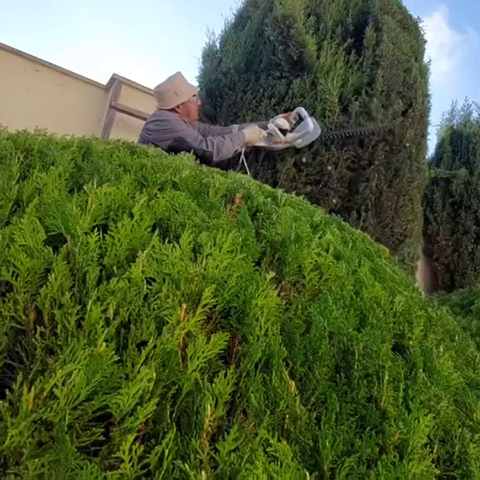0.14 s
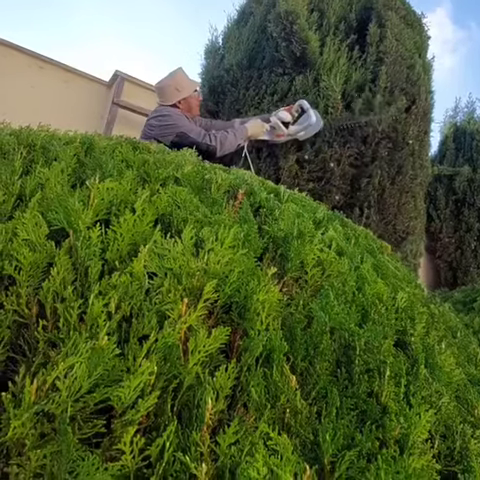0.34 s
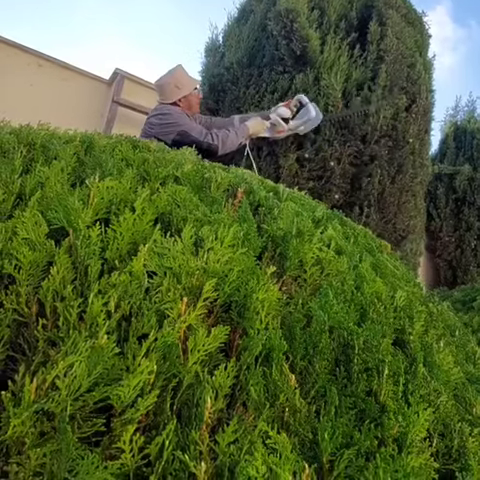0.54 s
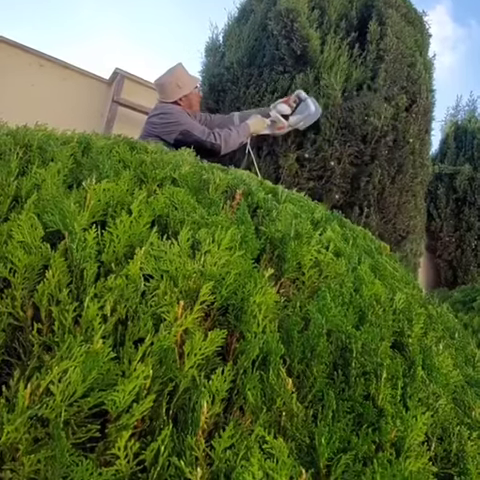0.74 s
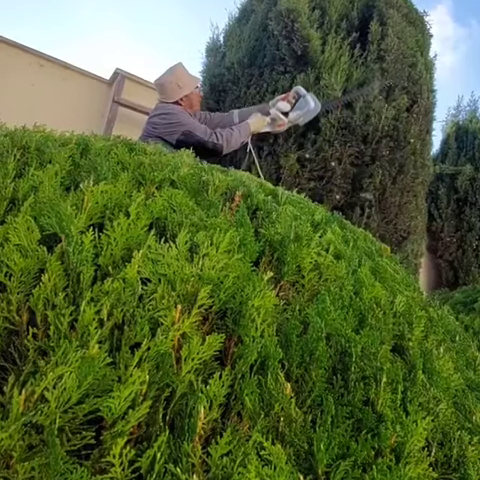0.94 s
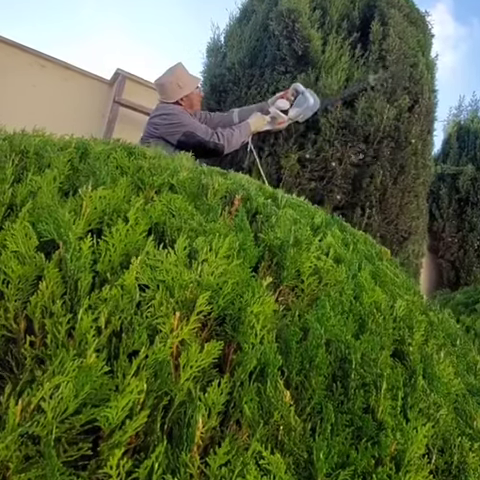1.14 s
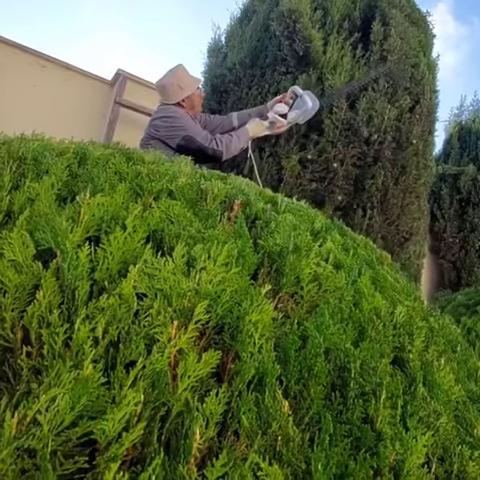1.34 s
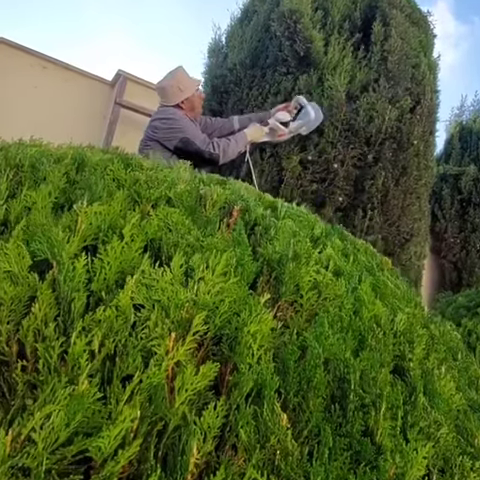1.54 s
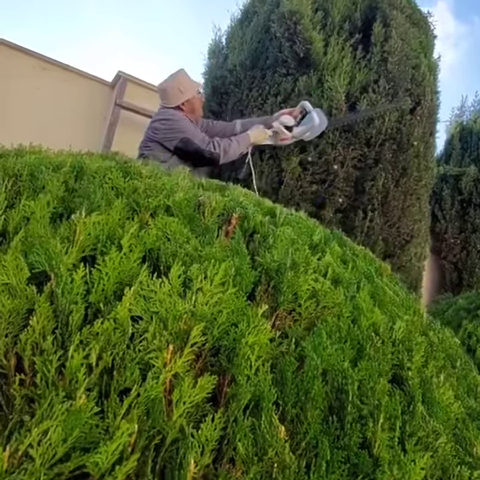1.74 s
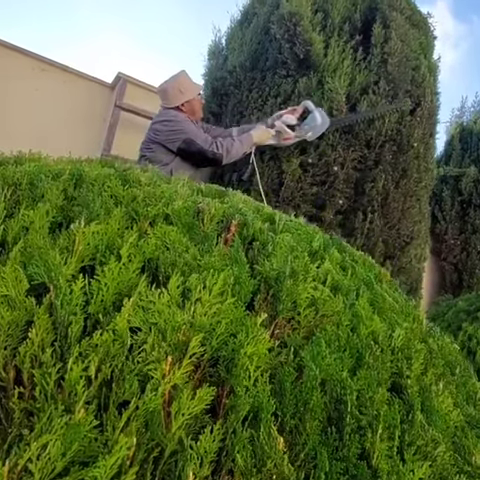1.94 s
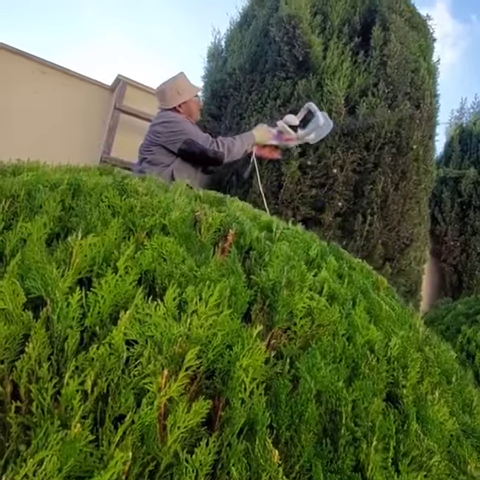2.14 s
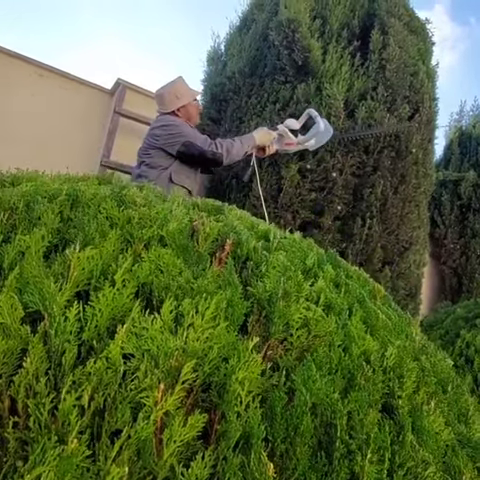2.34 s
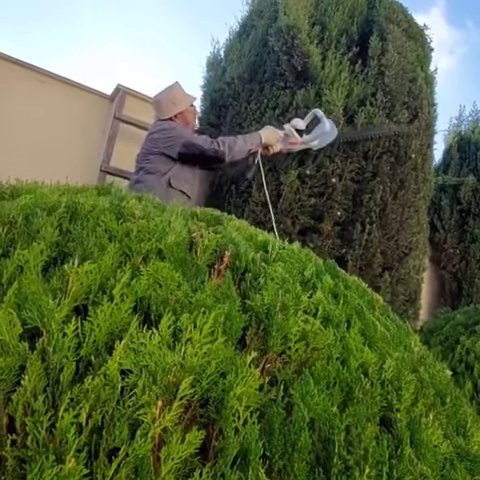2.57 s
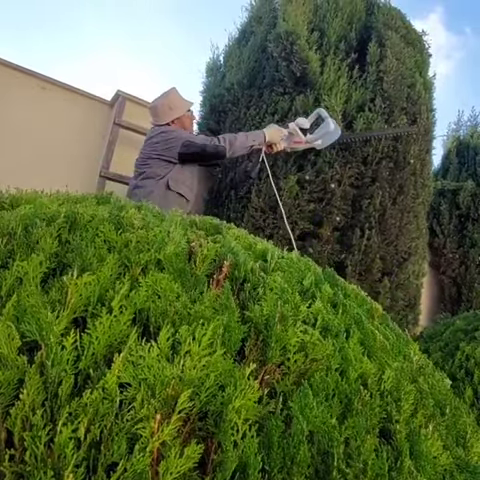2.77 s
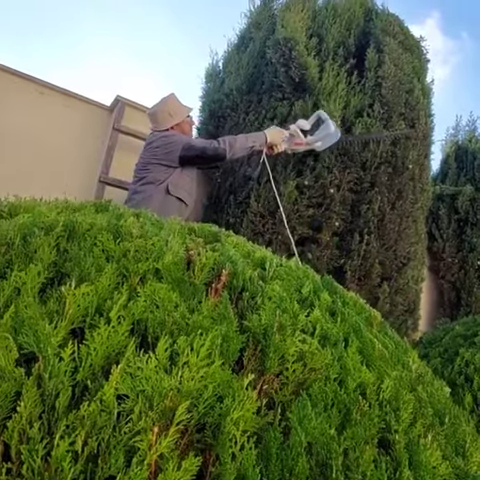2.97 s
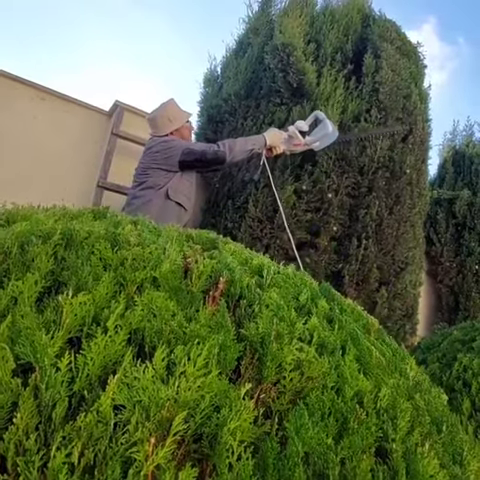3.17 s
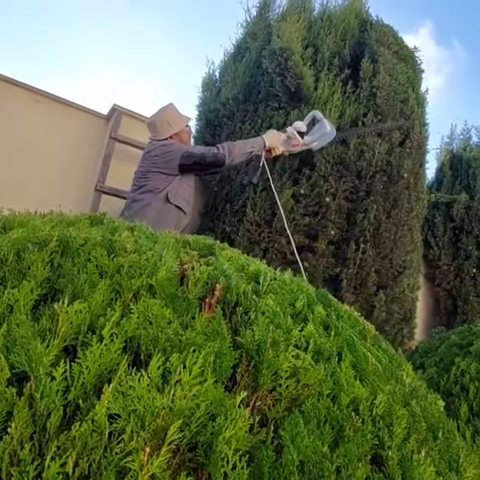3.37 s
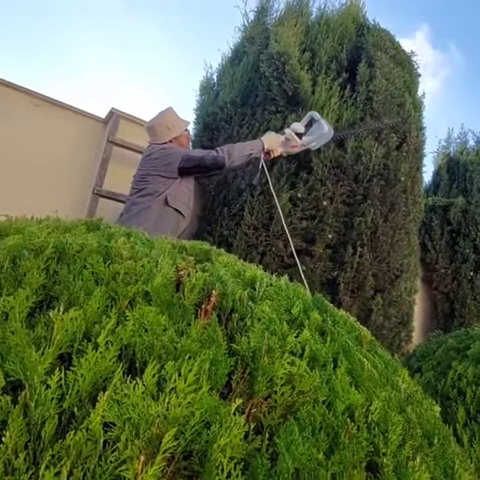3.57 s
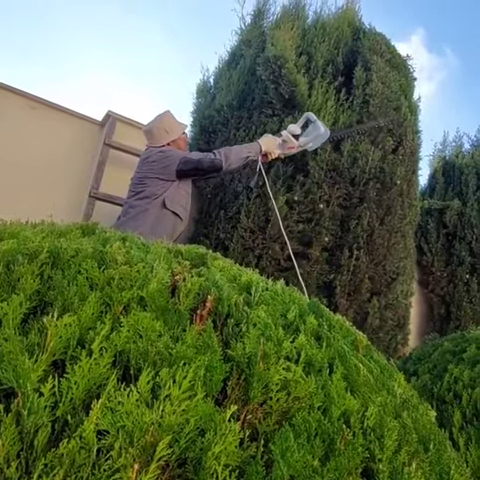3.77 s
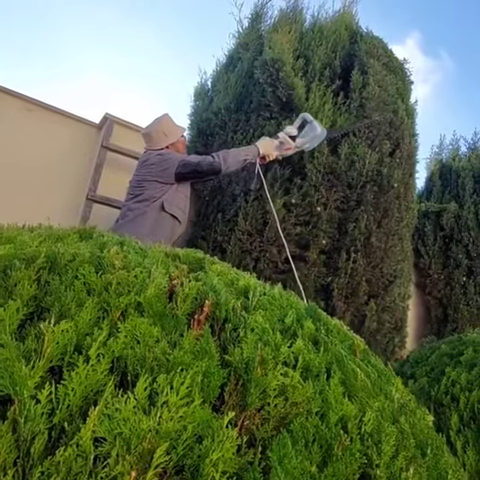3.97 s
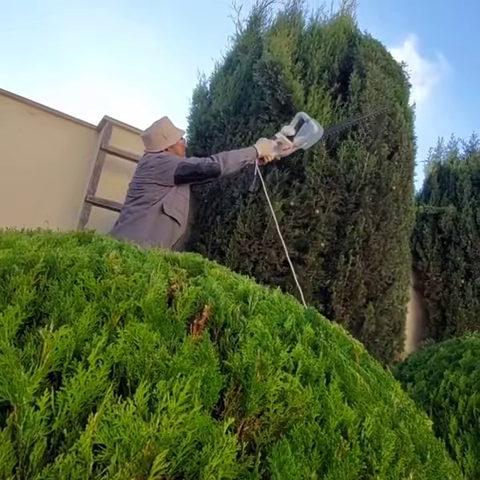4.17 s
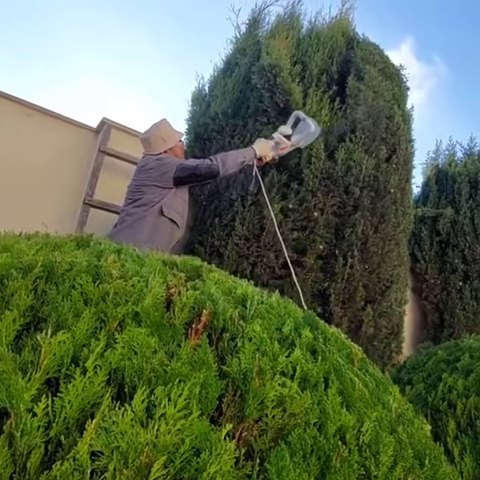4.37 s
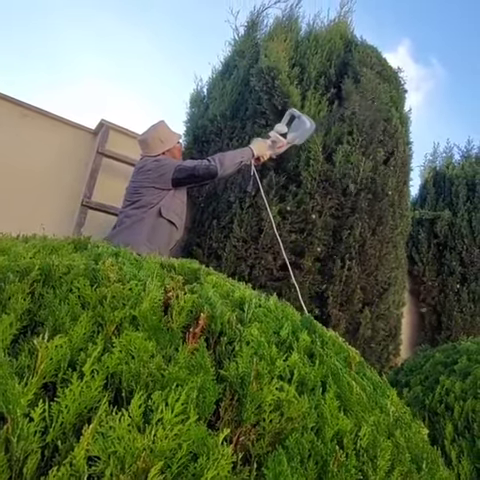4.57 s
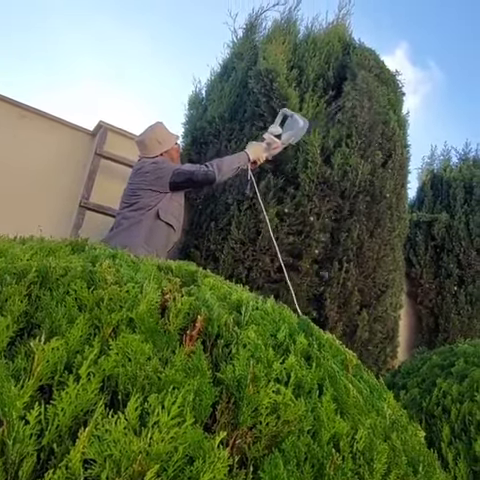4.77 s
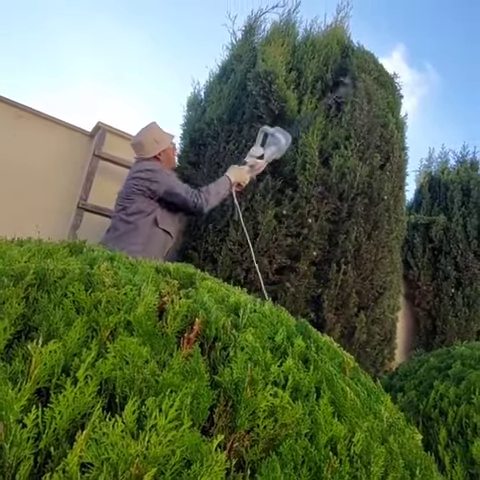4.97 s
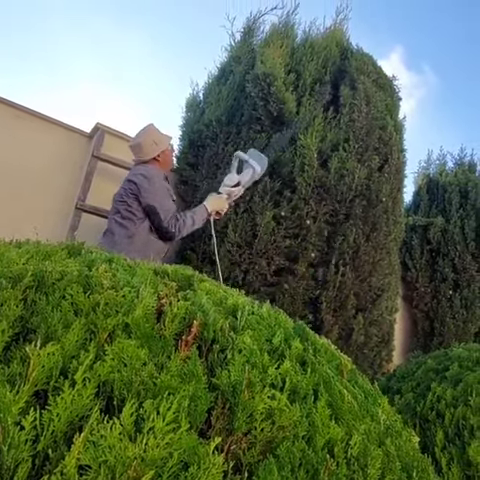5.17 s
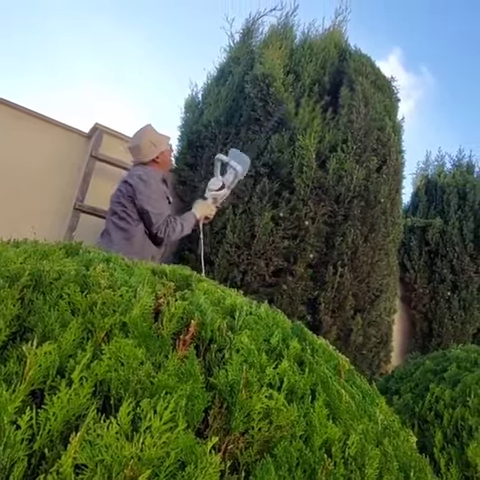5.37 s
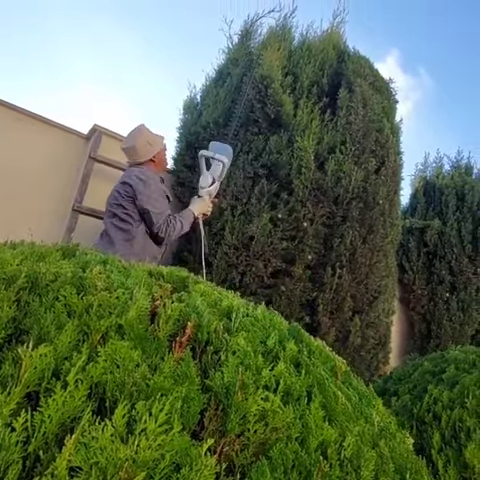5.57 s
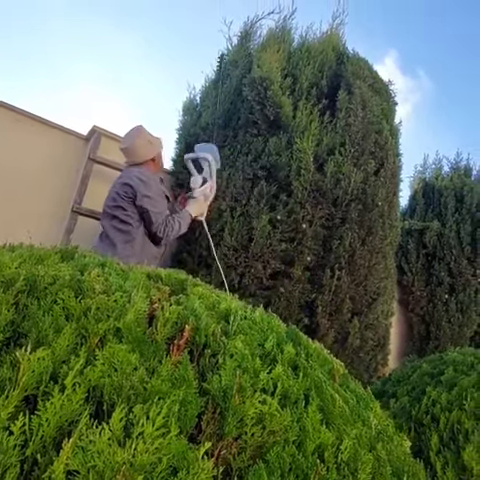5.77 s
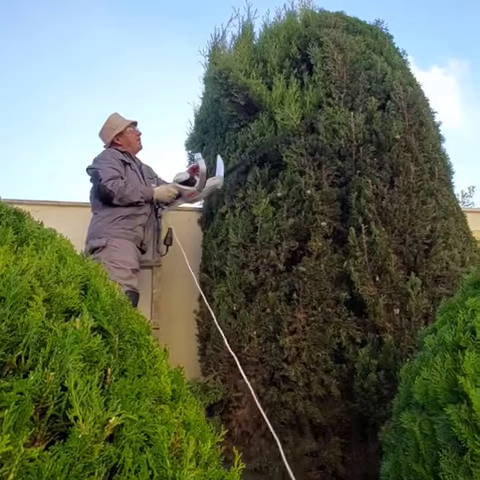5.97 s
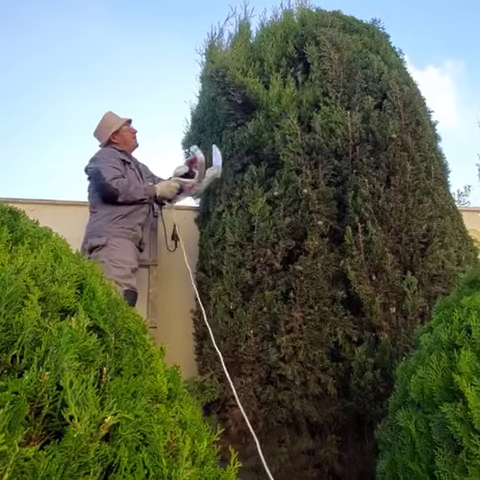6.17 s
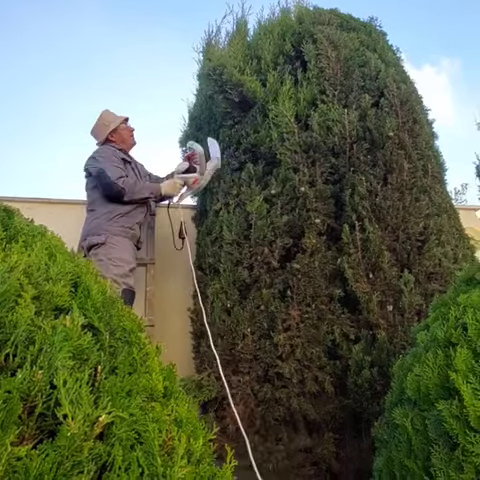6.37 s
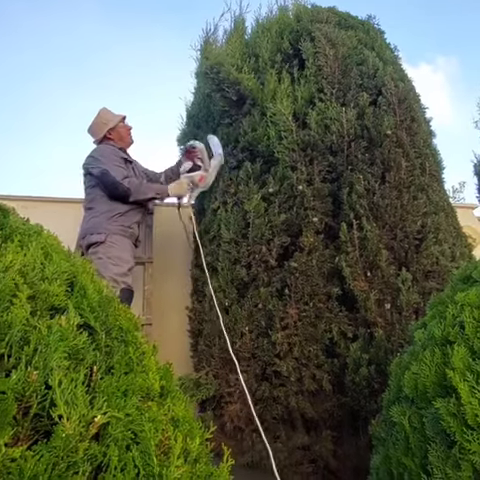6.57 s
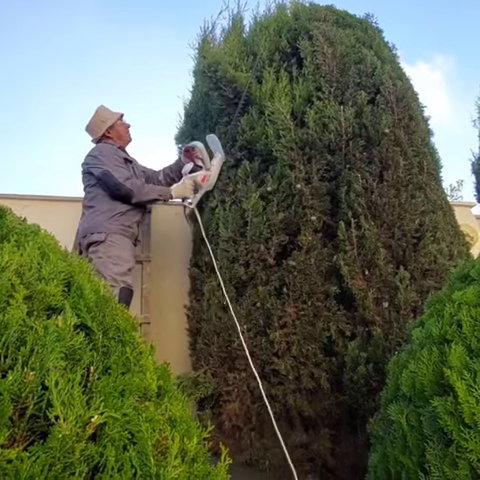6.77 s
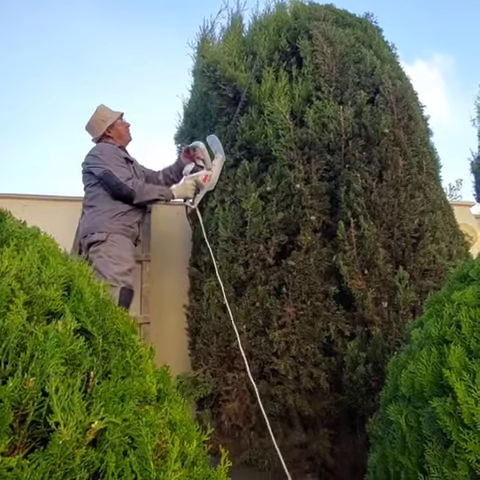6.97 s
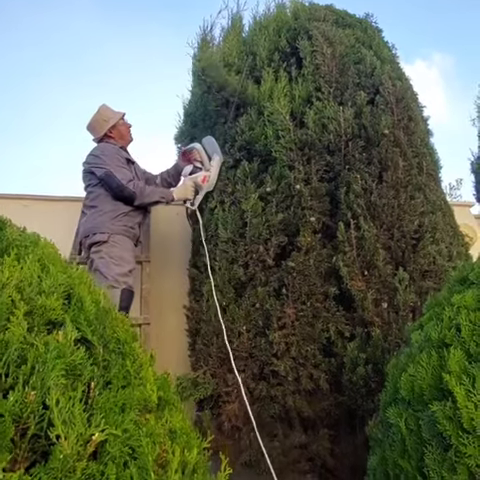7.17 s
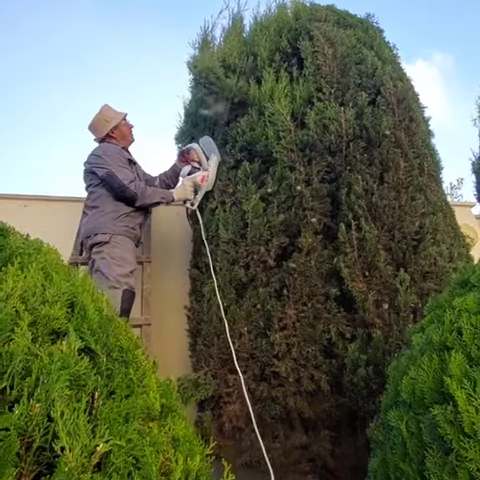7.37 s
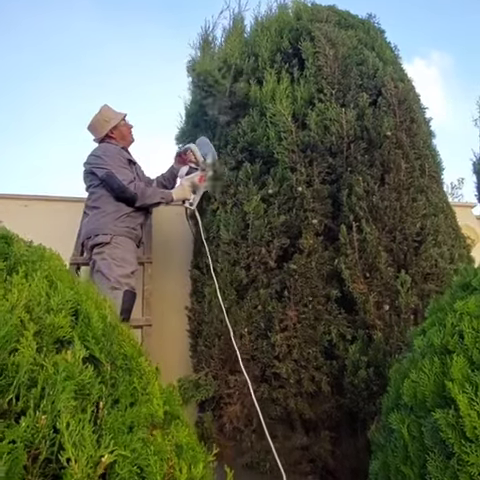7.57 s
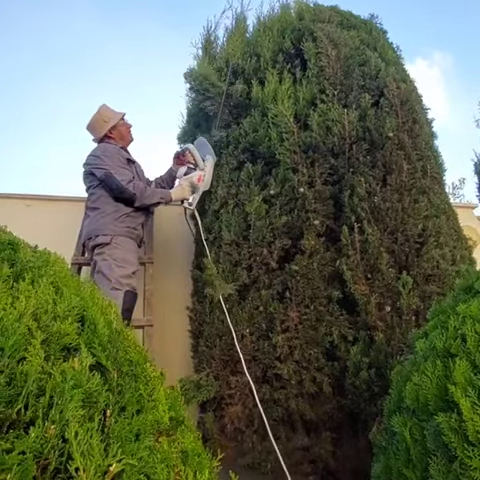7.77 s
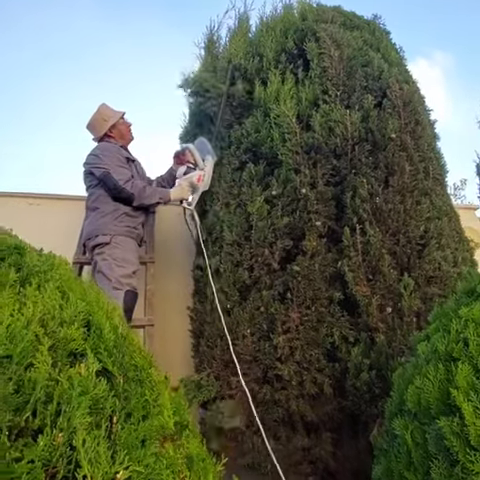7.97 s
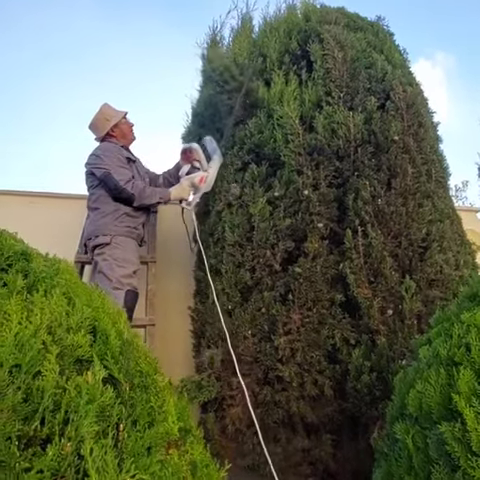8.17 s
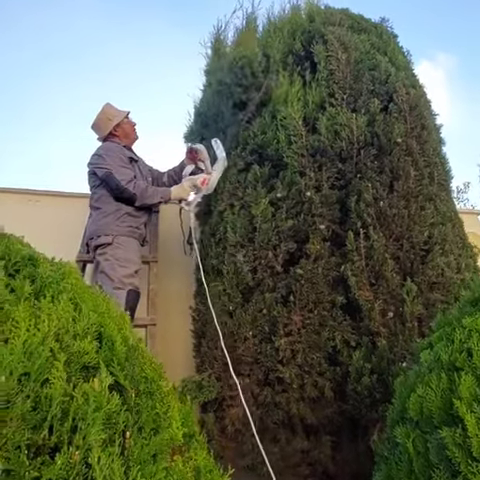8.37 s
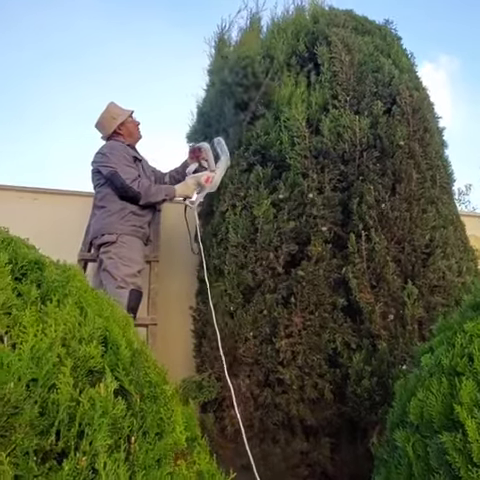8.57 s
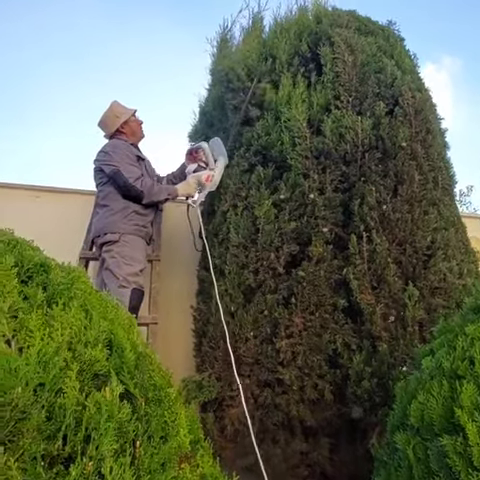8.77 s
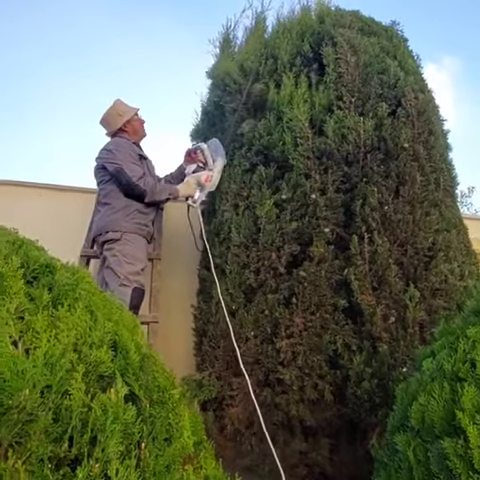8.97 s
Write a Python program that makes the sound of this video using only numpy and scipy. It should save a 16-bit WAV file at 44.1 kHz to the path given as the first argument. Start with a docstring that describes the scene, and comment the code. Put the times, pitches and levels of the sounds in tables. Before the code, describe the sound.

In a quiet walled garden, an electric hedge trimmer sounds three times: a quick blip, a run of about four and a half seconds, and another run lasting to the end. Its fast motor whines while the blades grind and snip through twigs, the pitch sagging only slightly under load. Each stop rings briefly off the walls, and faint ticks come from the right of the microphone in the pauses.

```python
"""You hear an electric hedge trimmer rasp and whine three times in a walled garden: a blip, then two long runs.
A fast motor turns a small gear on a big crank wheel, which shakes the blades through conifer twigs.
Each run starts at or near full speed and stops short, and the walls ring on. The pauses hold
quiet air, small ticks and one faint moan. The trimmer is left of two microphone openings, the ports."""
import sys
import numpy as np
from scipy import signal
from scipy.fft import irfft
from scipy.io import wavfile
from scipy.ndimage import uniform_filter1d

SR = 44100
rng = np.random.default_rng(int(sys.argv[2]) if len(sys.argv) > 2 else 0)


def waveform_to_disk(signal):
    """Save audio, clipped to [-1, 1], as 16-bit WAV at the path in sys.argv[1]."""
    frames = np.transpose(np.atleast_2d(signal))
    scaled = np.clip(frames, -1, 1) * 32767
    samples = np.round(scaled).astype(np.int16)
    wavfile.write(sys.argv[1], SR, samples)


N = 397763

FREE_SPEED_HZ, SPIN_UP_S = 470.0, .34  # motor turns a second with no load; how slowly it catches up
PINION_TEETH, WHEEL_TEETH = 4, 61  # the small gear and the crank wheel
SNIPS_PER_S, SNIPS_DB = 250, -2  # cut twigs; their level is set against the smooth noise
RING_HZ, RING_WIDTH_HZ, MESH_RING_SHARE = 1950, 160, 0.35  # housing ring; the main gear tone's share
RASP_HZ, RASP_WIDTH_HZ = 5090, 830
HOLLOW_HZ, HOLLOW_WIDTH_HZ = 2740, 370
BITE_HZ, BITE_WIDTH_HZ = 6800, 260
TREBLE_HZ, TOP_HZ, CUTOFF_HZ = 9100, 11640, 12980
MOAN_WIDTH_HZ = 50
LEAD_SAMPLES = SR // 2  # the motor is worked out from this far before the scene

# Each run, and the background from its start on: start_s, stop_s, air_db, leaves_db, starts_slow_by_hz
TRIMMER_RUNS = [(0.0, 0.064, -69, -62, 0), (0.519, 5.095, -70.5, -91.5, 0), (6.4383, 9.5, -67.5, -90, 29)]
# How much cutting slows the motor: time_s, slowdown_hz
LOAD_SLOWDOWN = [(0.53, 7.8), (1.04, 5.6), (1.18, 7.6), (1.36, 7), (1.75, 2.3), (2.4, .9), (3.2, .3),
                 (3.83, 3.3), (4.2, 4), (4.59, 7.6), (4.75, 6.8), (4.8, 8.9), (4.95, 7.3), (5.1, 7),
                 (6.4, 6.8), (6.45, 2), (7.3, 2.8), (7.48, 8.6), (7.8, 7.6), (8.05, 6.2), (8.4, 1.8),
                 (8.88, 0)]
# How the tool is held: time_s, swing (0 held out, 1 held up)
TOOL_SWING = [(0.0, 1), (0.5, 0.48), (0.53, 0.031), (1.5, 0.049), (2.7, 0.44), (4.2, 0.65), (5.1, 0.67),
              (6.45, 0.96), (9.02, 0.86)]
# The grinding noise over time: time_s, level_db, ring_db, rasp_db, treble_db, left_over_right_db
GRIND_LEVELS = [(0.0, -22.5, 14.5, 8, -2, -2), (0.07, -10.5, 12, -6.5, -1.5, -4.5),
                (0.53, -19, 4.5, -4.5, -3.5, 1), (1.58, -20, -2.5, -4, -3, 1),
                (2.63, -19.5, -0.5, -2, 2, -1), (3.4, -20, 1, -0.5, 2, -1.5),
                (4.1, -19.5, -1.5, -0.5, 2.5, -2), (4.73, -21, -1.5, 1.5, 1.5, -2),
                (5.08, -19, 2.5, -2, 2.5, -2), (6.45, -20, 22, 2.5, -5, -1),
                (6.9, -20, 13.5, 3.5, -2.5, -2), (7.41, -20.5, 15, 2, -0.5, -1.5),
                (7.9, -21.5, 9, 3, 2, -2), (8.38, -20.5, 4, 1.5, 3.5, -2.5), (9.02, -21.5, 5.5, 3.5, 6, -2)]
# Boosts and cuts below and above the rasp: time_s, hollow_db, top_db, bite_db
GRIND_SHADES = [(0.0, 2.5, 4.5, -2), (0.53, 2, 0.5, 1.5), (1.5, 1.5, 3, 0.5), (2.3, -4.5, -2.5, 3.5),
                (3.0, -5.5, -1, 2.5), (4.0, -4.5, 0.5, -1.5), (5.1, 2, 2, -1), (6.45, -3, 1.5, 3.5),
                (7.2, 3.5, -3, -1), (8.0, 3.5, -9.5, -2), (9.02, 5, -12, 0)]
# The blades make the grind throb: beats_per_crank_turn, depth
BLADE_BEATS = [(1, 0.07), (2, 0.05), (4, 0.05)]
# How much of the grind repeats on every crank turn: pitch_hz, power_share
REPEAT_SHARE = [(150, .7), (330, .5), (600, .35), (1200, .6), (1900, .55), (2400, .2), (3300, .2),
                (5000, .5), (10000, .25)]
# The slowest ripples in the wear pattern: cycles_per_crank_turn, level_db
CRANK_RIPPLES = [(4, -2), (5, -4.5), (6, 5), (7, 2.5), (8, 0), (9, 1.5), (10, 0.5), (11, 3.5), (12, -9),
                 (13, 2), (14, 6), (16, -16.5)]
# Low resonances of the casing: pitch_hz, half_width_hz, boost_db
CASING_RESONANCES = [(199, 33, -1), (627, 72, 7), (1116, 25, 5.5)]
# The housing ring faces the right port, which gets more of ring_db: left_share, right_share
RING_SIDES = [
    [[0.27]],
    [[0.8]],
]
# Tones tied to the motor shaft: cycles_per_turn, kind (0 fan, 1 gear, 2 hum), left_db, right_db
SHAFT_TONES = [(1, 2, -6, -5), (4, 1, -9.5, 0), (8, 1, -8, -10), (12, 1, -21.5, -21), (17, 0, 0, -12)]
# The crank load swings the tooth force, adding side tones: offset_cycles_per_crank_turn, level_db
GEAR_SIDE_TONES = [(-2, -14.5), (-1, -4), (1, -15), (2, -15.5), (3, -19.5), (4, -19), (5, -7), (6, -15.5)]
# The fan's whine: time_s, level_db
FAN_LEVELS = [(0.53, -36), (0.62, -33), (0.95, -28), (1.03, -45), (1.12, -26), (1.3, -30.5), (1.35, -31),
              (1.56, -27.5), (1.72, -33), (1.8, -37.5), (2.04, -36), (2.1, -40), (2.39, -28.5), (2.5, -35),
              (2.6, -28.5), (2.9, -32), (2.97, -41), (3.1, -24), (3.4, -36), (3.7, -56), (3.85, -29),
              (3.98, -31), (4.1, -45.5), (4.23, -27), (4.54, -40.5), (4.62, -33), (4.74, -33.5),
              (4.85, -31), (4.9, -39), (4.97, -25.5), (5.05, -40.5), (5.12, -41.5), (6.44, -25),
              (6.46, -29), (6.5, -43), (6.7, -36), (6.88, -31), (7.28, -23), (7.53, -29.5), (7.67, -26),
              (8.02, -26.5), (8.14, -35), (8.3, -34), (8.75, -25.5), (9.01, -33)]
# Meshing gear teeth and shaft hum: time_s, gear_db, hum_db
GEAR_AND_HUM_LEVELS = [(0.53, -33.5, -36.5), (0.8, -32, -40), (1.04, -32, -39), (1.3, -28.5, -41.5),
                       (1.7, -30, -36), (2.1, -34.5, -43), (2.4, -38, -42), (2.75, -37, -36.5),
                       (3.2, -37, -45), (3.68, -37.5, -62), (3.85, -36, -69), (4.3, -28.5, -41),
                       (4.7, -34, -44), (4.9, -29.5, -44), (5.1, -38, -62), (6.45, -46.5, -35.5),
                       (6.96, -43, -36), (7.15, -39, -45), (7.33, -48, -59), (7.45, -38, -40),
                       (7.8, -33.5, -40), (8.08, -32, -44.5), (8.18, -34.5, -45), (8.3, -33, -36),
                       (8.5, -32, -37), (8.75, -31.5, -38), (9.01, -36, -34)]
# Gear tones at the left port as the housing turns: time_s, boost_db
GEAR_LEFT_BOOST = [(0.53, -3), (2.0, 1), (3.7, 5.5), (5.1, 1), (6.45, 0.5), (7.3, -3), (7.5, -7),
                   (8.15, -7), (8.3, 6), (9.02, 2)]
# Typical level wobble of each kind of tone: fan_db, gear_db, hum_db
TONE_FLUTTER = [1.5, 1.8, 1.5]
# Fade time of the tones as a multiple of the walls' ring time: fan_factor, gear_factor, hum_factor
TONE_FADE_FACTORS = [1.15, .8, .8]
# Colour at the ports, tool held out or up: pitch_hz, out_left_db, out_right_db, up_left_db, up_right_db
PORT_COLOURS = [(30, -46, -41.5, -46.5, -44), (60, -28.5, -26, -28.5, -33), (109.7, -25, -23.5, -24, -23.5),
                (152, -22, -18, -22.5, -21.5), (235, -16.5, -15.5, -14.5, -18.5),
                (290, -13.0, -12, -10.5, -12.5), (400, -10.5, -9.0, -6, -8.5), (503, -10, -7.5, -8, -13),
                (724, -12, -8.5, -8, -9), (920, -5, -6, -2.5, -6.5), (1200, -7, -4, -3, -6),
                (1530, 0.0, 2.5, 0.5, -2), (2220, -5.5, -6.5, -4.5, -4.5), (2270, -1, 3, 1.5, -5.5),
                (2640, -3.5, -1, -2.5, -3), (3220, -4, -2, -2.5, -5.5), (3570, -6, 1, -5, -3.5),
                (3840, -5.0, 3.5, 0, -0.5), (4340, -5.5, 3.5, -7.5, 2.5), (4800, 0.5, 1, -2.5, -2),
                (5270, -5, 0.5, -8, -2), (5680, -9.5, -7, -5, -5.5), (6100, -6, -5.5, -9, -8.5),
                (6660, -5.5, -13.5, -4, -11.5), (7000, -3.5, -17.5, -7.5, -9),
                (7500, -4, -21.5, -2.5, -13.5), (8400, -4.5, -22.5, -5.5, -18), (8600, -2, -25, -12, -18),
                (9300, -7, -20, -9, -10.5), (10200, -6.5, -15.5, -8.5, -6.5), (11400, -7, -4, -7, -7),
                (12620, -5.5, -10.5, -3.5, -6), (13000, -2.5, -9, -11, -13.5)]
# How far the right port lags behind the left: pitch_hz, held_out_cycles, held_up_cycles
RIGHT_PORT_LAG = [(30, 0, 0), (340, .03, 0), (860, .19, .12), (1380, .22, .11), (1890, .38, .14),
                  (2410, .57, .47), (2930, .64, .49), (3450, .9, .47), (3960, 1.05, .48), (4480, 1.37, .9),
                  (5000, 1.53, 1.4), (5510, 1.95, 1.57), (6030, 2.02, 2.0), (7000, 2.5, 2.1),
                  (13000, 5.4, 4.6)]
# The walls' ring: pitch_hz, ring_time_s (to fall 60 dB), walls_over_direct_db, left_right_likeness
WALL_RING = [(59, .35, 9.5, 0.17), (160, 0.71, -1, 0.72), (304, 0.57, -5.5, 0.67), (486, 0.61, 7, 0.32),
             (582, 0.65, -3, 0.84), (696, 0.57, 5, 0.3), (1744, 0.62, 2, 0.15), (2220, .55, -5.5, .1),
             (2970, 0.55, -7, 0.032), (3570, 0.4, 4, .05), (4650, 0.38, 4.5, 0.041),
             (7550, 0.38, 0.5, 0.061), (12940, 0.11, 17, 0.039)]
# Small ticks in the pauses: start_s, peak_db, left_over_right_db
TICK_EVENTS = [(0.329, -49, -15), (0.338, -54, -18), (0.406, -51, -15), (0.458, -54, -15),
               (0.487, -54, -19), (0.498, -54, -21), (5.525, -58, -12), (5.7538, -65, -13.5),
               (5.841, -64, -15.5), (5.931, -51.5, -18), (5.95, -60, -15), (5.9958, -63, -14.0),
               (6.111, -69, -15.5), (6.1439, -65, -16.0), (6.2043, -71, -15), (6.2677, -73, -12),
               (6.3555, -62.5, -12), (6.3789, -66, -13)]
# The notes that ring in a tick: pitch_hz, level_db, ring_time_s
TICK_NOTES = [(700, -6.5, 0.0096), (2420, -26, 0.0053), (3900, 4, 0.012), (4660, 18.5, 0.0034),
              (6500, -20, 0.0036)]
# Low thuds: start_s, level_db, pitch_hz
THUD_EVENTS = [(.523, -47, 71), (7.535, -45, 64.6)]
# A faint moan after the second run: time_s, pitch_hz, level_db
MOAN_PATH = [(5.14, 573, -75), (5.26, 570, -52), (5.399, 560, -73), (5.5, 523, -82), (5.56, 547, -71),
             (5.62, 620, -74.5), (5.658, 673, -86)]
# Colour of the quiet garden air: pitch_hz, left_db, right_db
AIR_COLOUR = [(29.97, -14.5, -16), (87, 4, 9), (299, -9.5, -15.5), (420, -11, -11.5), (1000, -18, -18),
              (1890, -22, -15.5), (2574, -27.5, -30), (4430, -34, -3.5), (6440, -24, -22.5),
              (8670, -34, -35.5), (11100, -35.5, -15.5), (12370, -22, -18)]


def trimmer():
    """The motor drives a grind and a whine; each run cuts in already turning and leaves the walls ringing."""
    t = np.arange(-LEAD_SAMPLES, N) / SR
    lead_s = LEAD_SAMPLES / SR
    turns = np.cumsum(motor_speed(t)) / SR
    hz, frame_s, spectra = grind(t, turns * PINION_TEETH / WHEEL_TEETH)
    out = np.zeros((2, len(t)))
    since_stop_s = np.full(len(t), 9.)  # long enough for the tones to be silent
    next_starts = [run[0] for run in TRIMMER_RUNS[1:]] + [t[-1] + 1]
    for (start_s, stop_s, *_), next_s in zip(TRIMMER_RUNS, next_starts):
        used = (frame_s > start_s - lead_s) & (frame_s < min(next_s, stop_s + 2 * lead_s) + .1)
        run_s = frame_s[used]
        switch_off = np.clip((stop_s - run_s) / 0.026, 0, 1)
        heard = garden_walls(hz, run_s, spectra[:, :, used] * switch_off)
        part = np.zeros_like(out)
        add(part, run_s[0] - t[0], to_samples(heard, len(t)))
        switch_on = np.clip((t - start_s) / 0.002 + (start_s == 0), 0, 1)
        out += part * switch_on * (t < next_s)
        if start_s > 0:  # the opening blip has no whine
            since_stop_s[t >= start_s] = np.maximum(t[t >= start_s] - stop_s, 0)
    return (out + whine(t, turns, since_stop_s))[:, LEAD_SAMPLES:]


def motor_speed(t):
    """Turns a second: the free speed, less what cutting and a slow start take away."""
    still_to_gain_hz = sum(slow_hz * np.exp(-np.maximum(t - start_s, 0) / SPIN_UP_S) * (t >= start_s)
                           for start_s, *_, slow_hz in TRIMMER_RUNS)
    return FREE_SPEED_HZ - at_time(LOAD_SLOWDOWN, t)[0] - still_to_gain_hz


def grind(t, crank_turns):
    """Gears, sliding blades and cut twigs: repeating wear plus fresh noise, returned as spectra."""
    throb = np.exp(sum(depth * np.cos(2 * np.pi * (beats * crank_turns + rng.random()))
                       for beats, depth in BLADE_BEATS))
    snips = twig_snips(len(t))
    fresh = rng.standard_normal(len(t)) + gain_of(SNIPS_DB) * snips
    hz, frame_s, (worn, new) = to_spectra(throb * np.array([wear(crank_turns), fresh]))
    frame_s = frame_s + t[0]
    share = np.clip(at_pitch(REPEAT_SHARE, hz)[0], 0, 1)[:, None]
    worn = unit_level(worn) * np.sqrt(np.mean(hz < CUTOFF_HZ))  # wear fills only part of the spectrum
    spectra = np.sqrt(share) * worn + np.sqrt(1 - share) * unit_level(new)
    spectra = spectra * gain_of(grind_colour_db(hz, frame_s))
    spectra /= np.sqrt(np.mean(to_samples(spectra, len(t)) ** 2))
    level_db, *_, pan_db = at_time(GRIND_LEVELS, frame_s)
    return hz, frame_s, spectra * gain_of(level_db + np.outer([.5, -.5], pan_db))[:, None]


def twig_snips(count):
    """Each cut twig is a tiny burst of noise with a random time and strength."""
    strength = gain_of(2.8 * np.minimum(rng.exponential(1, count), 4))
    cuts = strength * (rng.random(count) < SNIPS_PER_S / SR)
    bursts = signal.lfilter([1], [1, -np.exp(-1 / (0.0037 * SR))], cuts)  # 3.7 ms decay
    return unit_level(bursts * rng.standard_normal(count))


def wear(crank_turns, turns_alike=12.57):
    """The same scratches and knocks pass on every crank turn and change only slowly."""
    size, count = 16384, 3  # three patterns, each one turn long
    ripples = np.exp(2j * np.pi * rng.random((count, 460)))  # column k cycles k times a turn
    ripples *= gain_of(1.7 * rng.standard_normal(ripples.shape))
    ripples[:, 1::2] *= .6  # both blades move alike, so half turns resemble each other
    for cycles, db in CRANK_RIPPLES:
        ripples[:, cycles] *= gain_of(db) / abs(ripples[:, cycles])
    place = np.arange(size + 1) / size
    out, start = 0, rng.random()
    for k, pattern in enumerate(irfft(ripples, size)):
        blend = np.cos(np.pi * (crank_turns / turns_alike / count + k / count + start))
        out = out + blend * np.interp(crank_turns % 1, place, np.append(pattern, pattern[0]))
    return unit_level(out)


def grind_colour_db(hz, frame_s):
    """Casing, blades and ports boost some pitches of the grind and cut others."""
    _, ring_db, rasp_db, treble_db, _ = at_time(GRIND_LEVELS, frame_s)
    hollow_db, top_db, bite_db = at_time(GRIND_SHADES, frame_s)
    bands = [(bump(hz, RASP_HZ, RASP_WIDTH_HZ), rasp_db),
             (bump(hz, HOLLOW_HZ, HOLLOW_WIDTH_HZ), hollow_db),
             (bump(hz, BITE_HZ, BITE_WIDTH_HZ), bite_db),
             (1 / (1 + (TREBLE_HZ / (hz + 1)) ** 6), treble_db),
             (1 / (1 + (TOP_HZ / (hz + 1)) ** 24), top_db)]
    bands_db = sum(np.outer(shape, db) for shape, db in bands)
    shade_db = 1.1 * patches(bands_db.shape, bins=14, frames=16)  # leaves and the moving tool
    casing_db = sum(db * bump(hz, pitch, width) for pitch, width, db in CASING_RESONANCES)[:, None]
    housing_db = np.array(RING_SIDES) * np.outer(bump(hz, RING_HZ, RING_WIDTH_HZ), ring_db)
    return bands_db + shade_db + casing_db + housing_db + port_colour_db(hz, frame_s)


def whine(t, turns, since_stop_s):
    """Fan blades, gear teeth and an unbalanced shaft each sing tones that follow the motor's speed."""
    levels_db = at_time(FAN_LEVELS, t) + at_time(GEAR_AND_HUM_LEVELS, t)  # a list: fan, gear, hum
    ring_db = at_time(GRIND_LEVELS, t)[1]
    turned_db = at_time(GEAR_LEFT_BOOST, t)[0]
    tones = [(*row, 0, MESH_RING_SHARE * (row[0] == PINION_TEETH)) for row in SHAFT_TONES]
    mesh = next(row for row in SHAFT_TONES if row[0] == PINION_TEETH)
    tones += [(PINION_TEETH * (1 + offset / WHEEL_TEETH), *mesh[1:], db, 1)
              for offset, db in GEAR_SIDE_TONES]
    steps_s, out = np.arange(t[0], t[-1] + 1, .03), 0
    sway_turns = 0.014 * wobble(t, steps_s[::4])  # the path to the right port wavers
    for cycles, kind, left_db, right_db, extra_db, ring_share in tones:
        hz = cycles * FREE_SPEED_HZ
        flutter_db = TONE_FLUTTER[kind] * wobble(t, steps_s)  # shaking hands and twigs
        housing_db = ring_share * bump(hz, RING_HZ, RING_WIDTH_HZ) * ring_db
        fade_db = 60 * since_stop_s / at_pitch(WALL_RING, hz)[0] / TONE_FADE_FACTORS[kind]
        db = extra_db + levels_db[kind] + housing_db + flutter_db - fade_db
        gains = gain_of([left_db + (kind == 1) * turned_db + db, right_db + db])
        phase = rng.random() - np.outer([0, 1], right_lag_cycles(hz, t) - cycles * sway_turns)
        out = out + np.sqrt(2) * gains * np.sin(2 * np.pi * (cycles * turns + phase))
    return out


def port_colour_db(hz, t):
    """The tone colour at each port shifts as the tool swings from held out to held up."""
    held_out, held_up = at_pitch(PORT_COLOURS, hz).reshape(2, 2, -1, 1)
    return held_out + (held_up - held_out) * np.clip(at_time(TOOL_SWING, t)[0], 0, 1)


def right_lag_cycles(hz, t):
    """Sound reaches the right port later, by an amount that depends on pitch and the tool's swing."""
    pitches, *lags = np.transpose(RIGHT_PORT_LAG)
    held_out, held_up = (np.interp(hz, pitches, lag) for lag in lags)
    swing = np.clip(at_time(TOOL_SWING, t)[0], 0, 1)
    return np.multiply.outer(held_out, 1 - swing) + np.multiply.outer(held_up, swing)


def garden_walls(hz, frame_s, spectra):
    """Mixes the direct sound with energy that lingers between the walls as fading noise."""
    ring_s, walls_db, likeness = at_pitch(WALL_RING, hz)[:, :, None]
    kept = gain_of(-2 * 60 * 256 / SR / ring_s[:, 0])  # share of the energy left after one frame
    energy = abs(spectra) ** 2
    for k in range(1, len(frame_s)):
        energy[:, :, k] = kept * energy[:, :, k - 1] + (1 - kept) * energy[:, :, k]
    noise = to_spectra(rng.standard_normal((2, 256 * (len(frame_s) - 1))))[2]
    make_alike(noise, np.clip(likeness, 0, 1))
    ring = np.sqrt(abs(uniform_filter1d(energy, 3, 1))) * unit_level(noise)
    delay = np.exp(-2j * np.pi * right_lag_cycles(hz, frame_s))
    direct = np.array([spectra[0], spectra[1] * delay])
    wall_gain = gain_of(walls_db)
    return (direct + wall_gain * ring) / np.sqrt(1 + wall_gain ** 2)


def ticks_and_thuds():
    """A tick is a short rattle that rings a few notes; a thud is one low note that dies at once."""
    out, t = np.zeros((2, N)), np.arange(4000) / SR
    ring = sum(gain_of(db - 60 * t / ring_s) * np.sin(2 * np.pi * hz * t)
               for hz, db, ring_s in TICK_NOTES)
    ring *= 1 - np.exp(-t / 0.00017)  # a soft start keeps the tick dull
    for start_s, db, pan_db in TICK_EVENTS:
        rattle = rng.standard_normal(len(t)) * np.exp(-t / 0.011) * (rng.random(len(t)) < .2)
        rattle[0] = 1.8  # the first hit
        tick = signal.fftconvolve(rattle, ring)
        gains = gain_of([db + pan_db / 2, db - pan_db / 2])
        add(out, start_s, np.outer(gains, tick / abs(tick).max()))
    for start_s, db, hz in THUD_EVENTS:
        thud = gain_of(db) * np.sin(2 * np.pi * hz * t) * np.exp(-t / .015)
        add(out, start_s, np.array([thud, thud]))
    return out


def moan():
    """A narrow, fuzzy tone sinks and then lifts as the garden falls quiet."""
    t = np.arange(MOAN_PATH[0][0], MOAN_PATH[-1][0], 1 / SR)
    hz, db = at_time(MOAN_PATH, t)
    noise = rng.standard_normal(SR) + 1j * rng.standard_normal(SR)
    fuzz = signal.lfilter([1], [1, -np.exp(-np.pi * MOAN_WIDTH_HZ / SR)], noise)[-len(t):]
    glide = np.exp(2j * np.pi * np.cumsum(hz) / SR)
    tone = np.sqrt(2) * gain_of(db) * (unit_level(fuzz) * glide).real
    out = np.zeros((2, N))
    add(out, t[0], np.array([tone, tone]))
    return out


def garden_air():
    """A distant, flickering hum and an even hiss of leaves, alike at both ports only in the bass."""
    hz, frame_s, noise = to_spectra(rng.standard_normal((2, N)))
    make_alike(noise, 0.5 * bump(hz, 0, 900)[:, None])
    flicker_db = 1.9 * patches(noise.shape[1:], bins=120, frames=4)
    starts_s, _, air_db, leaves_db, _ = np.transpose(TRIMMER_RUNS)
    run = np.searchsorted(starts_s, np.arange(N) / SR, "right") - 1  # the latest run to have started
    hum = to_samples(noise * gain_of(at_pitch(AIR_COLOUR, hz)[:, :, None] + flicker_db), N)
    hiss = to_samples(noise * gain_of(port_colour_db(hz, frame_s)), N)
    return gain_of(air_db[run]) * unit_level(hum) + gain_of(leaves_db[run]) * unit_level(hiss)


def gain_of(db):
    """Turns decibels into a number to multiply by."""
    return 10 ** (np.asarray(db) / 20)


def unit_level(x):
    """Scales a signal to an average power of 1."""
    return x / np.sqrt(np.mean(abs(x) ** 2) + 1e-20)


def bump(hz, centre_hz, half_width_hz):
    """A resonance shape: 1 at the centre, falling away on both sides."""
    return 1 / (1 + ((hz - centre_hz) / half_width_hz) ** 2)


def wobble(t, steps_s):
    """A line that wanders to a new random value at each step."""
    return np.interp(t, steps_s, rng.standard_normal(len(steps_s)))


def patches(shape, bins, frames):
    """Random blotches, smoothed over pitch (bins) and time (frames)."""
    return unit_level(uniform_filter1d(uniform_filter1d(rng.standard_normal(shape), bins, 0), frames, 1))


def make_alike(noise, likeness):
    """Blends the left noise into the right, in place."""
    noise[1] = likeness * noise[0] + np.sqrt(1 - likeness ** 2) * noise[1]


def at_pitch(table, hz):
    """Reads a table's columns at the pitches hz."""
    pitches, *columns = np.transpose(table)
    return np.array([np.interp(np.log(hz + 1), np.log(pitches + 1), c) for c in columns])


def at_time(table, t):
    """Reads a table's columns at the times t."""
    times, *columns = np.transpose(table)
    return [np.interp(t, times, c) for c in columns]


def to_spectra(x):
    """Cuts sound into frames 256 samples apart; gives their pitches, times and spectra."""
    return signal.stft(x, SR, nperseg=1024, noverlap=768)


def to_samples(spectra, count):
    """Joins the frames back into sound."""
    return signal.istft(spectra, SR, nperseg=1024, noverlap=768)[1][..., :count]


def add(mix, start_s, part):
    """Mixes a stereo sound in at start_s."""
    space = mix[:, round(start_s * SR):][:, :part.shape[1]]
    space += part[:, :space.shape[1]]


def scene():
    """The trimmer over the garden's quiet sounds."""
    return trimmer() + garden_air() + ticks_and_thuds() + moan()


def record(dry):
    """Removes the treble above CUTOFF_HZ."""
    low_pass = signal.firwin(1023, CUTOFF_HZ, window=("kaiser", 9), fs=SR)
    return signal.oaconvolve(dry, low_pass[None], "same", axes=1)


dry = scene()
out = record(dry)
waveform_to_disk(out)
```